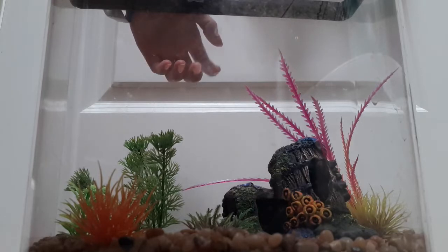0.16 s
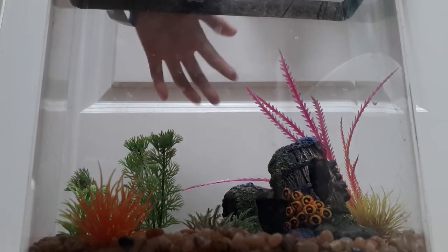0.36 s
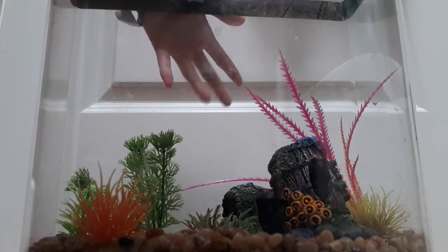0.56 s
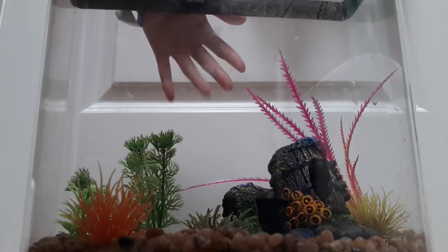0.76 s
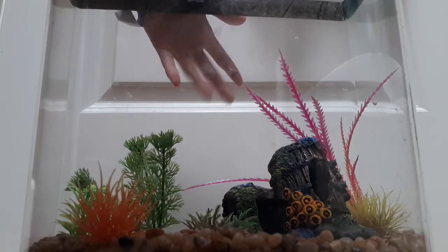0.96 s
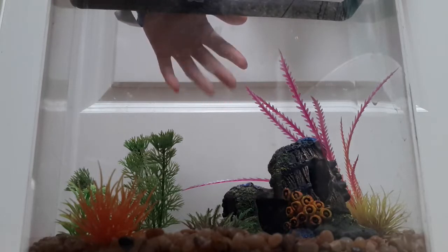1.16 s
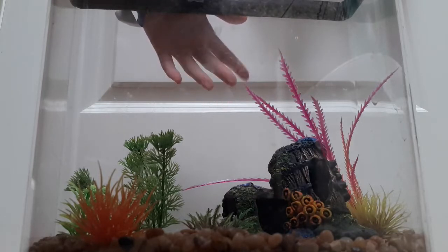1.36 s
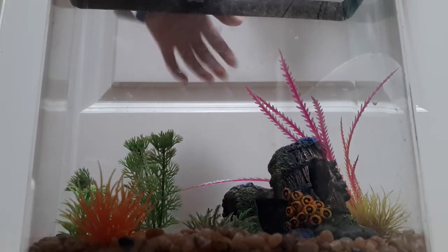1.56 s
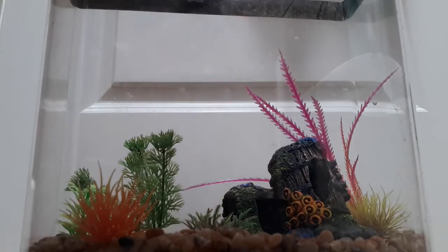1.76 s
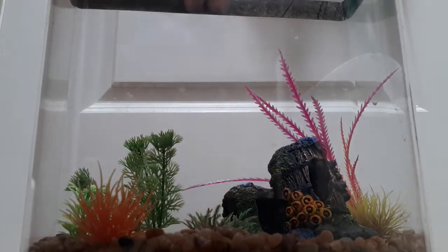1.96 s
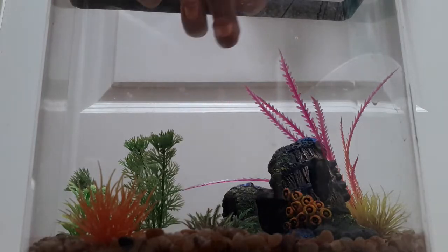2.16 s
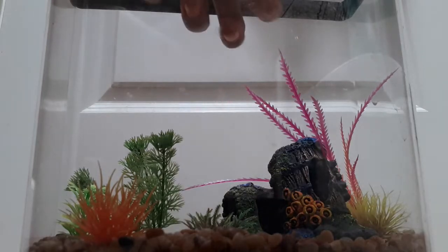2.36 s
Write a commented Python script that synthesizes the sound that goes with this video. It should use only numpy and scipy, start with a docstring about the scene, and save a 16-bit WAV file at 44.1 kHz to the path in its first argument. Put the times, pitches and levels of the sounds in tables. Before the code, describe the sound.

Fingertips drum a quick burst of hollow knocks on an empty glass tank, then softer low bumps and faint skin slides, a pause, and one last sharper tap; close microphone, small quiet room, steady low hum.

```python
"""Fingertips drum on the lid and glass of an empty tank, close to two microphone ports in a quiet room.
A steady mains hum (two sines), room air and port hiss (shaped noise) run throughout. The stand then
shudders low (swelling, decaying sines) and touches ring the panes (decaying modes, nail ticks, lid
clatter) with a short room tail; a rasp follows the hardest tap, then skin slides on glass (friction
noise). Taps and soft touches come in bursts, the last near the end."""
import sys
import numpy as np
from scipy import signal
from scipy.fft import rfft, irfft
from scipy.io import wavfile
from scipy.ndimage import uniform_filter1d

SR = 44100
rng = np.random.default_rng(int(sys.argv[2]) if len(sys.argv) > 2 else 0)


def volts_from_db(level):
    """Convert decibel levels to linear amplitude ratios."""
    exponent = np.asarray(level, float) / 20
    return 10 ** exponent


def store_pcm(level_fs):
    """Save levels as 16-bit WAV."""
    pcm = np.round(np.clip(level_fs, -1, 1) * 32767).astype(np.int16)
    wavfile.write(sys.argv[1], SR, np.atleast_2d(pcm).T)


N = 106677  # samples
RING_S = 0.35  # length of one touch

# strong modes of panes and lid, before weighting and scatter: pitch_hz, level_db, t60_s
TANK = [(163, 6.5, 0.36), (221.4, 2, 0.42), (253, 1.5, 0.45), (335, 4.5, 0.25), (380, -9.5, 0.45),
        (420, -6.5, 0.32), (588, -6, 0.088), (611.6, -4.5, 0.15), (630, 2, 0.077), (764, 2.5, 0.095),
        (862, -20.5, 0.36), (970, -8, 0.15), (1035, -10, 0.22), (1193, -8, 0.14), (1409, -16, 0.22),
        (1576, -4.5, 0.064), (1740, -13.5, 0.47), (1826, -32.5, 0.04), (1996, -11, 0.17),
        (2144, -5.5, 0.027), (2376, -31.5, 0.068), (3060, -7.5, 0.066), (3220, -9, 0.029)]


def evened(x):
    """Scales to rms 1."""
    return x / np.sqrt(np.mean(x ** 2) + 1e-20)


def read(points, hz):
    """Interpolates a table on a log-frequency axis."""
    f, value = np.transpose(points)
    return np.interp(np.log(hz + 1), np.log(f + 1), value)


def add(mix, start_s, sound):
    """Mixes a sound in at start_s, cut at the end of the mix."""
    part = mix[round(start_s * SR):][:len(sound)]
    part += sound[:len(part)]


def noise(spectrum):
    """White noise filtered to a given spectrum, rms 1."""
    gain = volts_from_db(read(spectrum, np.fft.rfftfreq(N, 1 / SR)))
    return evened(irfft(rfft(rng.standard_normal(N)) * gain, N))


def hum():
    """Mains hum: a steady fundamental and an octave that wavers slowly in level."""
    # partials, fundamental first: level_db
    partials_db = [-44, -60]
    hum_hz, waver_rms_db, octave_lag_rad = 120.32, 1, 1.96
    t, out = np.arange(N) / SR, np.zeros(N)
    for k, db in enumerate(partials_db):
        waver = uniform_filter1d(rng.standard_normal(N), size=2500)
        waver = evened(uniform_filter1d(waver, size=2500))
        level = np.sqrt(2) * volts_from_db(db + k * waver_rms_db * waver)  # k = 0: no waver
        out += level * np.sin(2 * np.pi * (k + 1) * hum_hz * t - k * octave_lag_rad)
    return out


def room_air():
    """Steady room air: shaped noise, mostly low."""
    # spectrum: pitch_hz, relative_level_db_per_hz
    air_spectrum = [(20, -40), (45, -20.5), (65, -7), (95, 2), (140, 2.5), (200, -8), (300, -5),
                    (500, -15.5), (800, -25.5), (1300, -35.5), (3300, -39.5), (5500, -39.5), (6500, -36.5),
                    (9500, -34), (11000, -38), (14000, -39), (15700, -45)]
    return volts_from_db(-56.5) * noise(air_spectrum)


def port_hiss():
    """Steady microphone noise, opposite in sign at the two ports."""
    # spectrum: pitch_hz, relative_level_db_per_hz
    hiss_spectrum = [(40, -20), (300, -5.5), (700, -12.5), (900, -26), (2500, -25.5), (5000, -20),
                     (8500, -16.5), (11000, -18.5), (14000, -20.5), (15700, -25)]
    return volts_from_db(-75) * noise(hiss_spectrum) * np.array([[1], [-1]])


def thumps():
    """The stand shudders at a low pitch: a sine that swells over about a cycle and decays."""
    # shudders: start_s, level_db (before makeup_db and envelope), pitch_hz
    thump_table = [(.095, -48, 73.4), (.155, -42, 74), (.24, -67, 75), (0.3, -38.5, 74), (.38, -64, 67.7),
                   (.59, -62, 66.5), (0.674, -41, 74), (.745, -62, 69), (0.788, -40.5, 72.7),
                   (1.04, -34, 77.5), (1.11, -55, 67), (1.161, -47.5, 68.6), (1.345, -54, 70.4),
                   (1.385, -34.5, 73), (1.484, -49, 72), (1.686, -66, 69)]
    rise_s, t60_s, makeup_db = 0.014, 0.21, 5.5
    out, t = np.zeros(N), np.arange(SR // 2) / SR
    swell = (1 - np.exp(-t / rise_s)) ** 2
    for start_s, db, hz in thump_table:
        envelope = swell * volts_from_db(db + makeup_db - 60 * t / t60_s)
        add(out, start_s, envelope * np.sin(2 * np.pi * hz * t))
    return out


def ring(modes, centre_hz, spread_oct, share, scatter, swell_s):
    """Decaying sine modes, weighted around the region that the touch drives best."""
    rise_cycles, min_spread_oct = 0.54, 0.15
    t = np.arange(round(RING_S * SR))[:, None] / SR
    hz, db, t60_s = modes
    octaves_off = np.log2(hz / centre_hz)
    weight = np.exp(-0.5 * (octaves_off / max(spread_oct, min_spread_oct)) ** 2) * scatter
    rise = 1 - np.exp(-t / (rise_cycles / hz + swell_s))
    decay = np.exp(-np.log(1000) * t / (share * t60_s))
    return (rise * decay * np.sin(2 * np.pi * hz * t)) @ (weight * volts_from_db(db))


def dense_modes():
    """The many weak modes between the strong ones, heard as a short dense knock."""
    # ring time of the weak modes: pitch_hz, t60_s
    dense_t60 = [(200, 0.27), (700, 0.13), (2000, 0.18), (5000, 0.15)]
    level_at_250_hz_db, tilt_db_per_oct, detune_rms = -8, -3.5, 0.025
    hz = np.geomspace(450, 7000, 60)
    detune, scatter = rng.standard_normal((2, len(hz)))
    level_db = level_at_250_hz_db + tilt_db_per_oct * np.log2(hz / 250)
    return (hz * (1 + detune_rms * detune), level_db, read(dense_t60, hz)), scatter


def touch(db, centre_hz, spread_oct, share, swell_s):
    """One touch: strong modes a little uneven, a dense knock and a rough clatter of the loose lid."""
    detune_rms, scatter_rms_db = 0.004, 1
    clatter_db, clatter_t60_s, clatter_ring_t60_s = -7, 0.56, 0.032
    t = np.arange(round(RING_S * SR)) / SR
    hz, level_db, t60_s = np.transpose(TANK)
    detune, uneven = rng.standard_normal((2, len(hz)))
    scatter = (-1.0) ** np.arange(len(hz)) * volts_from_db(scatter_rms_db * uneven)  # alternating signs
    strong = (hz * (1 + detune_rms * detune), level_db, t60_s)
    body = ring(strong, centre_hz, spread_oct, share, scatter, swell_s)
    dense, dense_scatter = dense_modes()
    body = body + ring(dense, centre_hz, spread_oct, share, dense_scatter, swell_s)
    grit = rng.standard_normal(len(t)) * volts_from_db(-60 * t / clatter_t60_s)
    short_body = body * volts_from_db(-60 * t / clatter_ring_t60_s)
    clatter = signal.oaconvolve(grit / np.linalg.norm(grit), short_body)[:len(t)]
    return volts_from_db(db) * (body + volts_from_db(clatter_db) * clatter)


def taps():
    """Firm taps ring the tank; each has a nail tick, a noise burst with a longer grainy treble."""
    # taps: start_s, strength_db, best_driven_hz, spread_octaves, share_of_free_ring_time, tick_db
    tap_table = [(.099, -38.5, 655, 1.15, 0.74, -58), (.160, -41.5, 710, 1.29, 0.79, -58.5),
                 (.243, -36, 560, 1.23, 0.55, -58), (.302, -29.5, 730, 1.01, .6, -47),
                 (1.046, -55, 600, 0.99, 1, -62), (1.203, -63.5, 695, .8, .45, -81),
                 (1.379, -54.5, 490, 0.8, 0.97, -80), (2.317, -35, 1910, .33, 0.12, -58)]
    # tick spectrum: pitch_hz, relative_level_db_per_hz
    tick_spectrum = [(900, -52), (1500, 0), (2600, -8.5), (3600, -15.5), (5000, -13), (6500, -15),
                     (9000, -12), (11800, -19), (13000, -33), (15500, -50)]
    tick_t60_s, spray_t60_s, spray_db = 0.016, 0.2, -7
    out, t, tick = np.zeros(N), np.arange(round(RING_S * SR)) / SR, noise(tick_spectrum)
    for start_s, db, centre_hz, spread_oct, share, tick_db in tap_table:
        add(out, start_s, touch(db, centre_hz, spread_oct, share, 0))
        envelope = volts_from_db(tick_db - 60 * t / tick_t60_s)
        envelope = envelope + volts_from_db(tick_db + spray_db - 60 * t / spray_t60_s)
        grain = np.roll(tick, -round(start_s * SR))[:len(t)]  # a different stretch per tap
        add(out, start_s, envelope * grain)
    return out


def nudges():
    """Soft touches and lid bounces: the same modes swelling in, without a tick."""
    # touches: start_s, strength_db, best_driven_hz, spread_octaves (ring() sets a floor),
    # swell_s, share_of_free_ring_time
    nudge_table = [(.1, -29.5, 335, 0.19, 0.0023, 0.34), (.112, -48, 253, 0.15, 0.0052, 0.41),
                   (.173, -32, 253, 0.18, .0055, 0.34), (.19, -45, 335, 0.12, .0075, 0.72),
                   (.256, -33, 335, 0.1, 0.0069, .55), (0.261, -44, 253, 0.12, .0045, 0.4),
                   (.314, -28, 335, 0.22, 0.0066, 0.44), (.318, -32, 253, .18, 0.01, 0.54),
                   (.372, -38.5, 253, 0.16, 0.0071, 0.58), (0.669, -54.5, 402, 0.83, 0.0089, 0.8),
                   (.78, -54.5, 604, 1, 0.0095, 0.73), (0.789, -48, 237, 0.32, .0035, 0.46),
                   (.805, -48.5, 335, 0.19, .0035, 0.79), (0.848, -55.5, 253, 0.15, 0.0097, 0.74),
                   (0.921, -55, 253, .18, 0.013, 0.71), (1.047, -42, 194, 0.26, .0025, 0.42),
                   (1.079, -46.5, 253, 0.14, 0.012, 1.3), (1.18, -51, 335, .18, 0.0065, 0.59),
                   (1.251, -58, 253, 0.16, 0.012, 0.89), (1.378, -39.5, 283, 0.25, 0.0034, 0.8),
                   (1.41, -61.5, 1300, 1.1, 0.0046, .55), (1.441, -47, 253, 0.11, 0.0077, 0.77),
                   (1.601, -49, 420, 0.51, 0.012, 0.78), (2.32, -48.5, 970, .22, 0.0024, 1.6),
                   (2.319, -39, 484, 0.57, 0.0013, 0.47), (2.345, -45, 286, 0.36, 0.0089, 0.58)]
    out = np.zeros(N)
    for start_s, db, centre_hz, spread_oct, swell_s, share in nudge_table:
        add(out, start_s, touch(db, centre_hz, spread_oct, share, swell_s))
    return out


def room(x):
    """Noise tail dying band by band; the two ports differ slightly, mainly in the treble."""
    # reverberation: pitch_hz, t60_s
    room_t60 = [(200, 0.32), (1000, 0.44), (4000, 0.31), (12000, 0.05)]
    side = 0.12  # share of port difference
    gap = np.arange(SR // 2) > 200  # silent samples before the tail
    common, differing = rng.standard_normal((2, SR // 2)) * gap
    differing = differing - uniform_filter1d(differing, size=60)
    ports = np.array([common + side * differing, common - side * differing])
    hz, t, z = signal.stft(ports, SR, nperseg=256)
    decay = volts_from_db(-60 * t / read(room_t60, hz)[:, None])
    tail = signal.istft(z * decay, SR, nperseg=256)[1]
    return signal.fftconvolve(x[None], tail / np.linalg.norm(tail[0]), axes=1)[:, :N]


def scuff():
    """Rasp after the hardest tap: shaped noise that peaks early and fades."""
    # spectrum: pitch_hz, relative_level_db_per_hz
    scuff_spectrum = [(1350, -39), (2300, -12), (2640, -33), (3220, -5), (4720, -9), (5090, -6),
                      (9000, -18), (11700, -23), (19800, -120)]
    start_s, length_s, level_db = 0.305, 0.15, -67
    progress = np.clip((np.arange(N) / SR - start_s) / length_s, 0, 1)
    return volts_from_db(level_db) * np.sin(np.pi * progress ** 0.44) * noise(scuff_spectrum)


def slides():
    """Skin slides on glass: friction noise rings the panes faintly and hisses in the treble."""
    # strokes: start_s, length_s, ring_db, best_driven_hz, hiss_db
    slide_table = [(0.363, .19, -67, 1670, -71), (0.772, 0.11, -68.5, 980, -91),
                   (1.04, 0.073, -70.5, 1690, -79), (1.574, 0.16, -69, 1320, -67.5),
                   (1.662, 0.098, -73, 750, -82), (2.117, 0.12, -81, 1750, -83)]
    # hiss spectrum: pitch_hz, relative_level_db_per_hz
    fizz_spectrum = [(2000, -28), (3200, -7), (4000, -18), (5800, -25), (6500, -7), (8500, -15),
                     (11500, -4), (14300, -5.5), (15600, -37)]
    spread_oct, share = 0.46, 0.24  # share of free ring time
    t, fizz, out = np.arange(N) / SR, noise(fizz_spectrum), np.zeros(N)
    for start_s, length_s, ring_db, centre_hz, hiss_db in slide_table:
        progress = np.clip((t - start_s) / length_s, 0, 1)
        stroke = np.sin(np.pi * progress ** 1.24)  # exponent above 1: peaks late
        body = ring(np.transpose(TANK), centre_hz, spread_oct, share, 1, 0)
        friction = stroke * rng.standard_normal(N)
        out += volts_from_db(ring_db) * signal.oaconvolve(friction, body / np.linalg.norm(body))[:N]
        out += volts_from_db(hiss_db) * stroke * fizz
    return out


def scene():
    """Touches with their room tail and slides, over stand shudders, hum and room air."""
    port_lag, room_db = 0.24, -13
    hits = taps() + nudges()
    near = hits + slides() + scuff()
    # the slope, added with opposite signs, offsets the ports in time
    near = near + port_lag * np.gradient(near) * np.array([[1], [-1]])
    return near + volts_from_db(room_db) * room(hits) + thumps() + hum() + room_air()


def band_limit(x):
    """A steep low-pass at the top of the band."""
    return signal.sosfilt(signal.butter(12, 15710, fs=SR, output="sos"), x)


def record(dry):
    """Adds the hiss of the microphone ports and returns the finished mix."""
    mix = dry + port_hiss()
    return band_limit(mix)


dry = scene()
out = record(dry)
store_pcm(out)
```